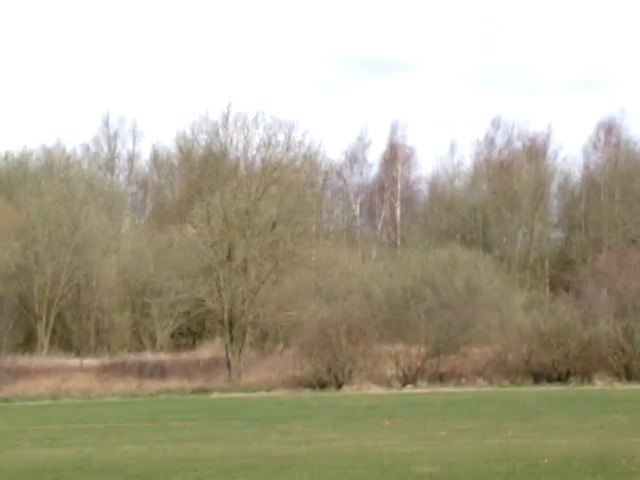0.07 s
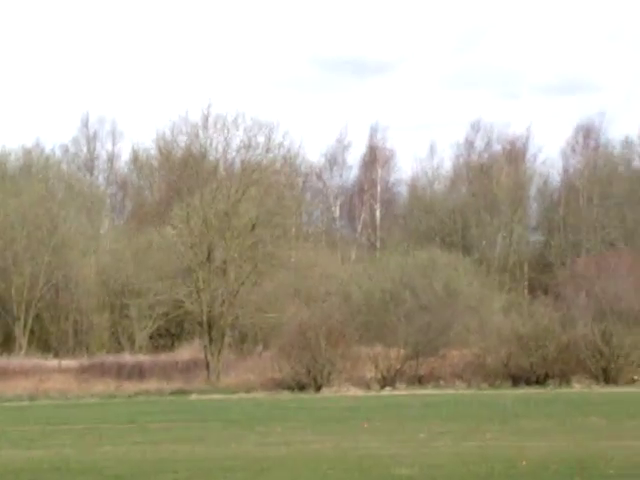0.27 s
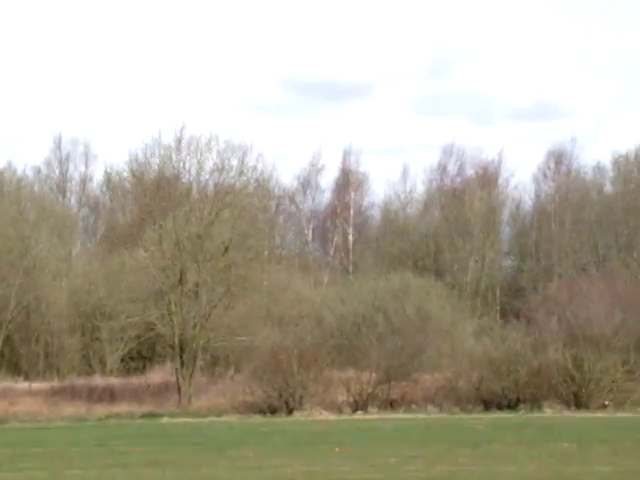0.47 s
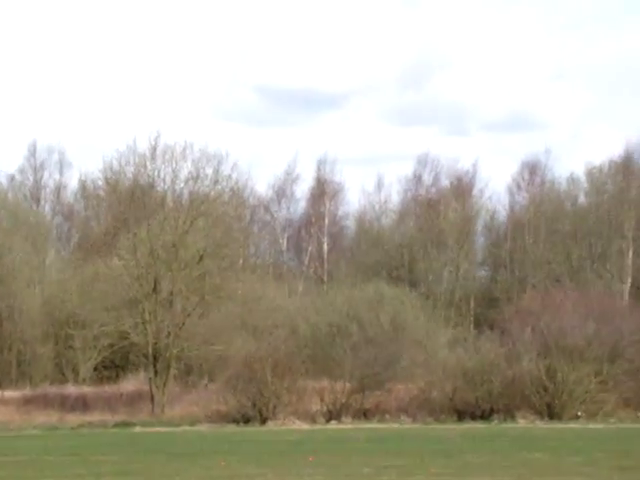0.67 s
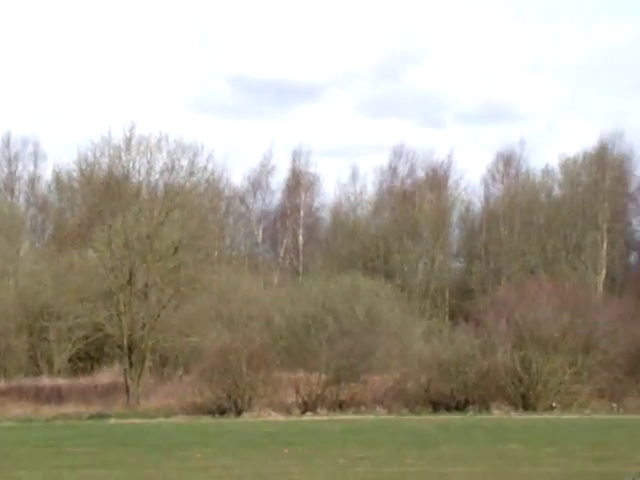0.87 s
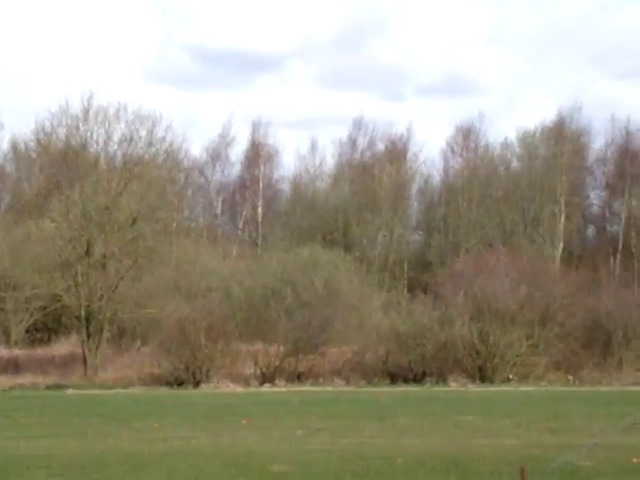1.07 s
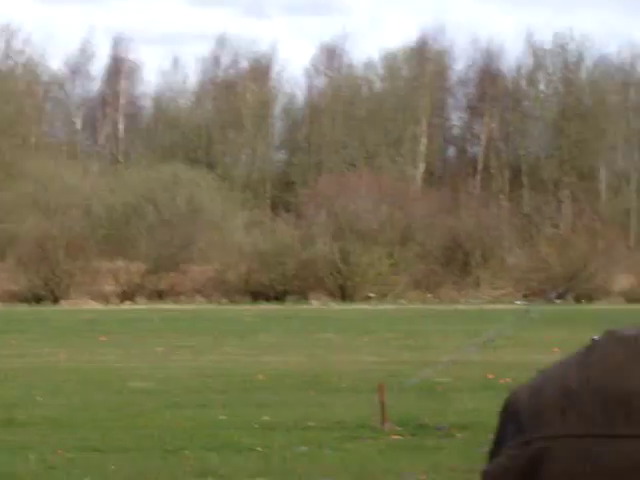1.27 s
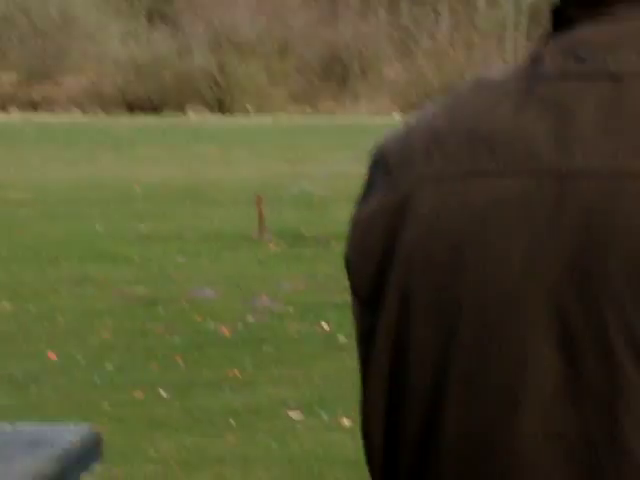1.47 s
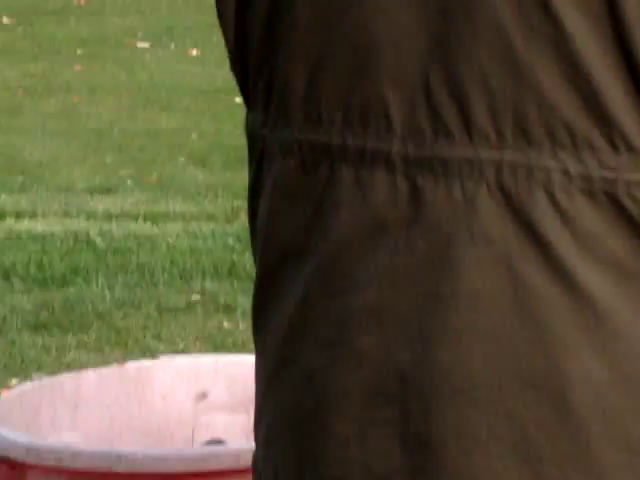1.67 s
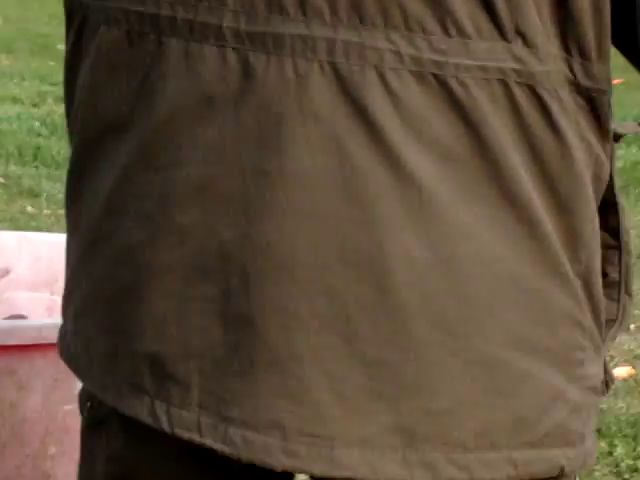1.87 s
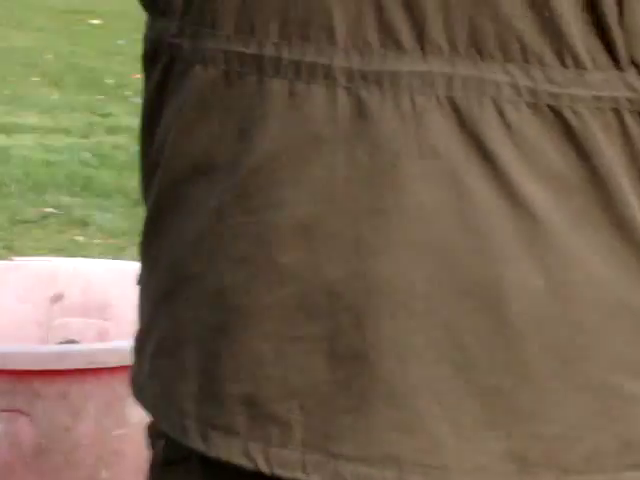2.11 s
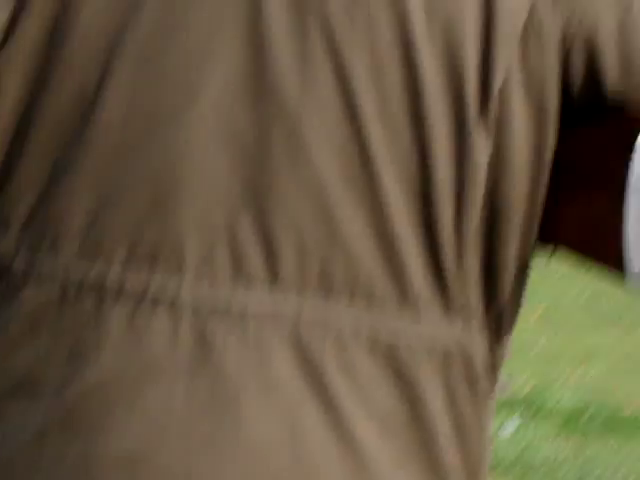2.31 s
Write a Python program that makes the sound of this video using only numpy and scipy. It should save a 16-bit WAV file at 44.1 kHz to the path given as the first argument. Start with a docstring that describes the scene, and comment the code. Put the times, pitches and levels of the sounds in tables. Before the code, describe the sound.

A close shotgun blast echoes across an open field, followed by gun clicks and another shot.

```python
"""A clay range in an open field, a small microphone close to the shooter. Over soft air come a rumble of grip
and two dull thuds. The shotgun fires: a harsh crash that overloads the microphone, then hard slaps from
nearby surfaces. The report rolls back from the woods across the field in long swells that lose their
treble, with one faint thud early on. As it fades, the shooter's jacket swishes, the gun clicks as it is
handled, and a shot from another stand pops in just after the first click."""
import sys
import numpy as np
from scipy import signal
from scipy.fft import rfft, irfft
from scipy.io import wavfile
from scipy.ndimage import uniform_filter1d

SR = 44100
rng = np.random.default_rng(int(sys.argv[2]) if len(sys.argv) > 2 else 0)


def master(y):
    """Save y as 16-bit WAV."""
    cut = np.clip(np.atleast_2d(y).T, -1, 1)
    pcm = np.round(cut * 32767)  # scale
    wavfile.write(sys.argv[1], SR, pcm.astype(np.int16))


N = 108045
T = np.arange(N) / SR
BAND_EDGE_HZ = 10060


def amp(db):
    """Decibels to gain."""
    return 10 ** (np.asarray(db) / 20)


def unit(x):
    """Scales to an rms of 1."""
    return x / np.sqrt(np.mean(x ** 2) + 1e-20)


def colour(x, spectrum, tilt_db=0):
    """Gives x a spectrum, tilted in dB per octave, at an rms of 1."""
    octave = np.log2(np.fft.rfftfreq(N, 1 / SR) + 1)
    hz, db = np.transpose(spectrum)
    gain = amp(np.interp(octave, np.log2(hz), db) + tilt_db * octave)
    in_band = octave < np.log2(BAND_EDGE_HZ) + 1 / 8
    return unit(irfft(rfft(x) * gain * in_band, N))


def noise(spectrum, tilt_db=0):
    """Coloured noise."""
    return colour(rng.standard_normal(N), spectrum, tilt_db)


def flutter(width_s, depth_db):
    """A gain that wanders at random, in lumps of the given width."""
    smooth = np.exp(-(np.fft.rfftfreq(N, 1 / SR) * width_s) ** 2)
    return amp(depth_db * unit(irfft(rfft(rng.standard_normal(N)) * smooth, N)))


def mottle(x, depth_db):
    """Crossing paths strengthen and cancel one another in brief random patches of the spectrum."""
    spectra = signal.stft(x, nperseg=128)[2]
    patches = uniform_filter1d(rng.standard_normal(spectra.shape), size=5, axis=0)
    patches = uniform_filter1d(patches, size=5, axis=1)
    return unit(signal.istft(spectra * amp(depth_db * unit(patches)), nperseg=128)[1][:N])


def grains(per_s, spread_db):
    """A dense train of random impulses of uneven size."""
    sizes = rng.standard_normal(N) * amp(spread_db * rng.standard_normal(N))
    return sizes * (rng.random(N) < per_s / SR)


def burst(start, rise, t60, hold=0):
    """Envelope: linear attack, hold, exponential release, all in seconds."""
    release = np.exp(-np.log(1000) * np.maximum(T - start - rise - hold, 0) / t60)
    return np.clip((T - start) / rise, 0, 1) * release


def ring(start, hz, rise, glide=0.26):
    """Envelope and phase (turns) of a few cycles that swell and die at once, falling towards hz."""
    age = np.maximum(T - start, 0) / rise
    return (age * np.exp(1 - age)) ** 2, hz * rise * (age + glide * (1 - np.exp(-age)))


# Colour of the open air (f/Hz, level/dB)
AIR_SPECTRUM = [(25, -20), (70, -13.5), (180, -8.5), (400, -2), (800, 4.5), (1500, 1.5), (3000, -8.5),
                (5000, -18), (9500, -16)]
# Course of its loudness (t/s, level/dB)
AIR_LEVEL = [(0, -41), (.4, -44.5), (1.1, -50.5), (1.55, -37.5), (2.3, -44), (2.45, -41.5)]
def field_air():
    """Soft wash of the open field around the microphone; the level dips after the shot."""
    level = amp(np.interp(T, *np.transpose(AIR_LEVEL)))
    return level * noise(AIR_SPECTRUM) * flutter(0.0093, depth_db=2.0)


# Colour of the grip and thud rumble (f/Hz, level/dB)
RUMBLE_SPECTRUM = [(25, -9), (70, -6), (200, -5.5), (420, -11), (800, -24.5), (4000, -55)]
# Dull thuds (t/s, knock level/dB, f/Hz, rumble level/dB)
THUDS = [(0.0627, -18, 302, -37.5), (0.1361, -20.5, 252, -41.5), (.6250, -36, 233, -55)]
def grip_and_thuds(rise_s=0.0018, t60_s=0.35):
    """A hand rumbles on the camera, right at the microphone; soft low knocks each trail a short rumble."""
    rumble = noise(RUMBLE_SPECTRUM)
    out = amp(-40.5) * noise(RUMBLE_SPECTRUM) * burst(0, 0.028, t60_s, hold=0.14)
    for start, db, hz, rumble_db in THUDS:
        swell, turns = ring(start, hz, rise_s)
        out += amp(db) * swell * np.sin(2 * np.pi * turns)
        out += amp(rumble_db) * rumble * burst(start, rise_s, t60_s)
    return out


# Colour of the shot's crash (f/Hz, level/dB)
CRASH_SPECTRUM = [(30, -40), (100, -33), (250, -10.5), (500, -1), (750, -13), (1100, 1.5), (3500, -0.5),
                  (9500, 1.5)]
# Pressure fronts of the muzzle blast and its ground bounce (t/s, level/dB, positive phase/s)
BLAST_FRONTS = [(0.2323, 0, 0.00023), (0.236, -3.5, 0.00024)]
def shotgun():
    """The gun at close range: a dense bright crash and two pressure fronts, each trailed by suction."""
    crackle = flutter(0.0007, depth_db=1.3)
    crash = colour(mottle(rng.standard_normal(N) * crackle, depth_db=3.5), CRASH_SPECTRUM)
    out = amp(-11.5) * crash * burst(0.2304, rise=0.0034, t60=0.37, hold=0.0097)
    for start, db, positive_s in BLAST_FRONTS:
        age = np.maximum(T - start, 0) / positive_s
        out += amp(db) * (T >= start) * (1 - age) * np.exp(-age)
    return out


def rough_knock(start, hz, rise, rasp=0, jitter_turns=0.033):
    """A reflection off an uneven surface: a few irregular cycles, with any rasp riding on them."""
    swell, turns = ring(start, hz, rise)
    wander = np.log(flutter(1 / hz, depth_db=20 / np.log(10)))  # rms of 1
    return swell * (np.sin(2 * np.pi * (turns + jitter_turns * wander)) + rasp)


# Slaps off nearby surfaces (t/s, knock level/dB, f/Hz, rise/s, spray level/dB, spray t60/s)
NEAR_SLAPS = [(.2720, -5.5, 1800, 0.00078, -13.5, 0.073), (0.3, -11, 1350, .0011, -11, 0.025),
              (0.3338, 0, 1230, 0.00089, -14.5, 0.1), (0.3742, -6.5, 1210, 0.0025, -18.5, 0.09),
              (.3794, -5, 1980, 0.0014, -25, 0.048), (0.3895, -22, 1800, 0.0023, -15.5, 0.11),
              (0.4100, -26, 1150, 0.0011, -19, 0.14), (0.4221, -15, 1300, 0.0013, -16, 0.039),
              (.4372, -19.5, 1300, 0.0012, -33, 0.61), (.4830, -22.5, 1400, 0.00089, -26.5, .035)]
# Colour of the sound they scatter (f/Hz, level/dB)
SPRAY_SPECTRUM = [(40, -36), (120, -45), (300, -21), (550, -5.5), (1400, 2.5), (3900, 3), (5500, -5),
                  (9500, -3)]
# Single reflections from far across the field (t/s, level/dB, f/Hz)
FAR_SLAPS = [(.516, -26, 840), (.6345, -31, 1940), (.767, -27, 2180), (0.858, -22, 1400), (1.014, -19, 950),
             (1.182, -24.5, 810), (1.293, -19, 690), (1.339, -20.5, 820), (1.36, -18.5, 816),
             (1.431, -15.5, 784), (1.614, -22, 880), (1.719, -23.5, 870)]
def slaps(low_cut_hz=400):
    """Hard surfaces each return a knock without bass; near ones add rasp and a crackling spray."""
    rasp = amp(-15.5) * noise(SPRAY_SPECTRUM)
    near = sum(amp(db) * rough_knock(start, hz, rise, rasp) for start, db, hz, rise, _, _ in NEAR_SLAPS)
    far = sum(amp(db) * rough_knock(start, hz, rise=0.0015) for start, db, hz in FAR_SLAPS)
    knocks = signal.lfilter(*signal.butter(2, low_cut_hz, "high", fs=SR), near + far)
    spray_power = sum((amp(db) * burst(start, 0.00068, t60)) ** 2 for start, *_, db, t60 in NEAR_SLAPS)
    scatter = mottle(rng.standard_normal(N), depth_db=3.0) * flutter(0.0036, depth_db=1.9)
    return knocks + np.sqrt(spray_power) * colour(scatter, SPRAY_SPECTRUM)


def air_absorption(x, start, db_per_khz_s=3, clear_hz=1950):
    """The later a reflection arrives, the more air it has crossed and the more treble it has lost."""
    hz, t, spectra = signal.stft(x, SR, nperseg=256)
    excess_khz = np.maximum(hz[:, None] - clear_hz, 0) / 1000
    loss_db = db_per_khz_s * excess_khz * np.maximum(t - start, 0)
    return signal.istft(spectra * amp(-loss_db), SR, nperseg=256)[1][:N]


# Colour of the wash off the trees (f/Hz, level/dB)
WOODS_SPECTRUM = [(60, -46), (250, -41), (400, -12), (650, -0.5), (1000, -0.5), (1500, 5), (2600, 1.5),
                  (4000, -1.5), (6000, -7.5), (9500, -14)]
# Colour of the echo's low boom (f/Hz, level/dB)
BOOM_SPECTRUM = [(100, -53), (300, -27.5), (480, -8.5), (680, 4.5), (880, 3.5), (1150, -7.5), (2000, -13),
                 (9000, -46)]
# Swells of the echo (t/s, wash level/dB, boom level/dB)
ECHO_SWELLS = [(0.441, -35, -63), (.53, -41, -45), (.60, -42, -68), (.69, -39, -64), (.76, -32, -51),
               (.83, -29, -35.5), (1.0, -32.5, -33.5), (1.131, -31.5, -43.5), (1.22, -32, -33),
               (1.33, -30, -26), (1.47, -29, -33.5), (1.62, -33, -34.5), (1.78, -38, -35.5),
               (2.0, -41, -42.5), (2.45, -61, -66)]
def woods_echo(reflections_per_s=9000):
    """From the woods across the field, countless small reflections arrive in swells."""
    times, wash_db, boom_db = np.transpose(ECHO_SWELLS)
    trunks = amp(-9.5) * colour(grains(per_s=280, spread_db=1.5), WOODS_SPECTRUM)  # sparse, so distinct
    wash = colour(mottle(grains(reflections_per_s, spread_db=1.5), depth_db=1.5), WOODS_SPECTRUM)
    boom = colour(grains(reflections_per_s, spread_db=-1.5), BOOM_SPECTRUM)
    roll = amp(np.interp(T, times, wash_db)) * (trunks + wash) + amp(np.interp(T, times, boom_db)) * boom
    roll *= (T > times[0]) * flutter(0.012, depth_db=1.39)
    return air_absorption(roll, times[0])


# Rubbing of the jacket (t/s, level/dB)
JACKET_LEVEL = [(1.2, -70), (1.55, -48), (1.90, -49), (1.95, -38), (1.985, -48.5), (2.06, -37.5),
                (2.17, -34.5), (2.22, -55), (2.27, -91)]
# Colour of the cloth (f/Hz, level/dB)
CLOTH_SPECTRUM = [(200, -25), (1000, 1), (3500, -5.5), (4500, 3), (5500, -5), (7500, 2.5), (9800, -4.5)]
def jacket():
    """Close by, the shooter's jacket rubs and swishes."""
    return amp(np.interp(T, *np.transpose(JACKET_LEVEL))) * noise(CLOTH_SPECTRUM)


# Clicks of the gun's action (t/s, level/dB, tilt/dB per octave, struck part f/Hz, its level/dB)
GUN_CLICKS = [(1.9207, -21.5, 3, 4350, -18.5), (1.9627, -18.5, 14, 7560, -28.5),
              (2.216, -32.5, 6, 2880, -36), (2.2493, -20, 5, 5870, -18.5),
              (2.2720, -24.5, 3.5, 3860, -22.5), (2.3193, -25, 4, 5490, -31)]
# Colour of a click before its tilt (f/Hz, level/dB)
CLICK_SPECTRUM = [(100, -48), (700, -19), (1400, 10), (2300, 2.5), (4200, 5), (5600, -8), (7500, -6),
                  (9500, -8)]
# Modes of the gun's steel (f/Hz, level/dB, t60/s)
STEEL_MODES = [(1466, -7.5, 0.027), (4450, -4, 0.015)]
def gun_clicks(rise_s=0.00038):
    """The gun handled near the microphone: each snap rings the steel and the small part that is struck."""
    out = np.zeros(N)
    for start, db, tilt_db, part_hz, part_db in GUN_CLICKS:
        steel = sum(amp(mode_db) * np.sin(2 * np.pi * hz * (T - start)) * burst(start, rise_s, t60)
                    for hz, mode_db, t60 in STEEL_MODES)
        part = np.sin(2 * np.pi * part_hz * (T - start)) * burst(start, rise_s, t60=0.013)
        snap = noise(CLICK_SPECTRUM, tilt_db) * burst(start, rise_s, t60=0.018)
        out += amp(db) * (steel + snap) + amp(part_db) * part
    return out


# Colour of the pop's tail (f/Hz, level/dB)
POP_TAIL_SPECTRUM = [(30, -11), (110, -4), (220, -0.5), (1200, -4), (3000, -6.5), (9000, -29)]
def distant_pop(start=1.9313, width_s=0.00021, low_cut_hz=390):
    """A shot from another stand: one rounded pressure wave that has lost its bass, with a brief tail."""
    age = (T - start) / width_s
    pulse = signal.lfilter(*signal.butter(2, low_cut_hz, "high", fs=SR), age / (1 + age ** 2) ** 2)
    tail = noise(POP_TAIL_SPECTRUM) * burst(start, rise=0.00085, t60=0.21)
    return amp(7.5) * pulse + amp(-31) * tail


def scene():
    """Near and far, everything at one microphone beside the shooter."""
    before = field_air() + grip_and_thuds()
    report = shotgun() + slaps() + woods_echo()
    after = jacket() + gun_clicks() + distant_pop()
    return (before + report + after)[None]


def record(dry):
    """The small microphone overloads on the highest peaks, then sheds the deepest bass and top treble."""
    ceiling, low_cut_hz = 0.75, 61
    squashed = dry / (1 + (dry / ceiling) ** 4) ** 0.25
    thinned = signal.lfilter(*signal.butter(1, low_cut_hz, "high", fs=SR), squashed)
    lowpass = signal.firwin(801, BAND_EDGE_HZ, window=("kaiser", 8), fs=SR)
    return signal.oaconvolve(thinned, lowpass[None], "same")


dry = scene()
out = record(dry)
master(out)
```